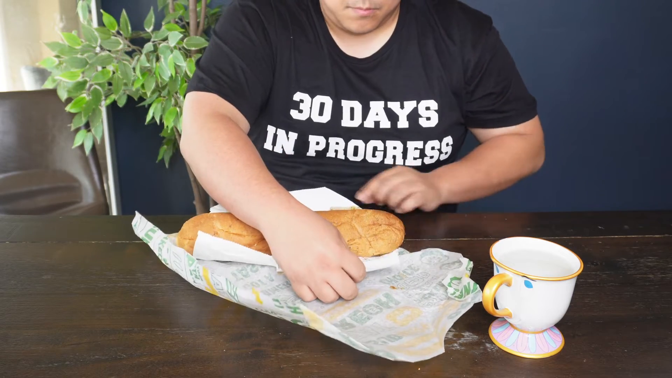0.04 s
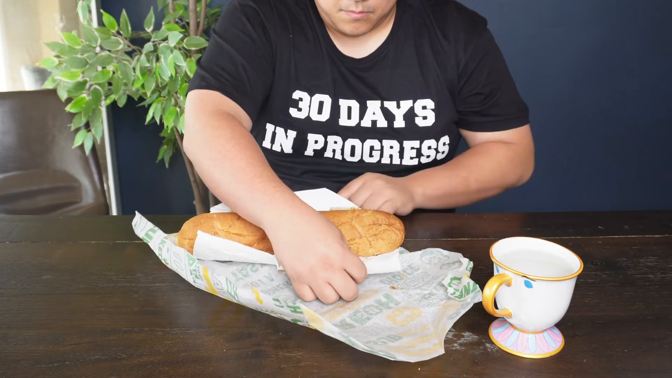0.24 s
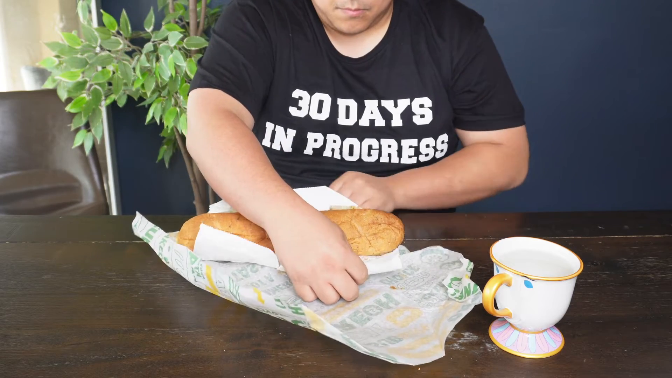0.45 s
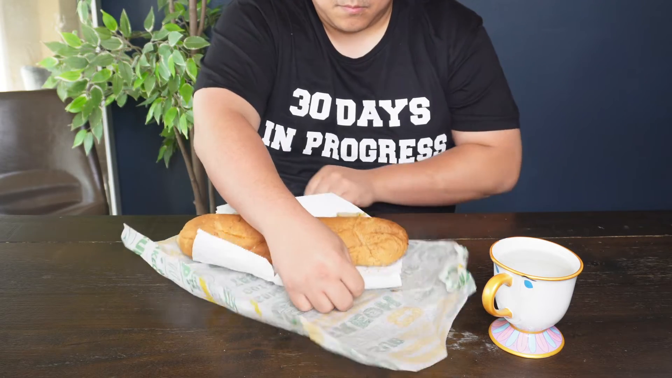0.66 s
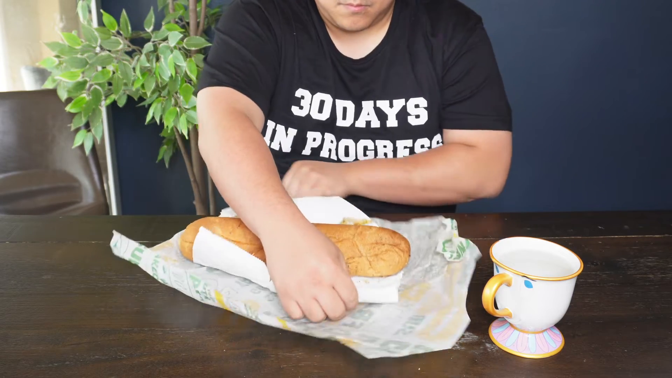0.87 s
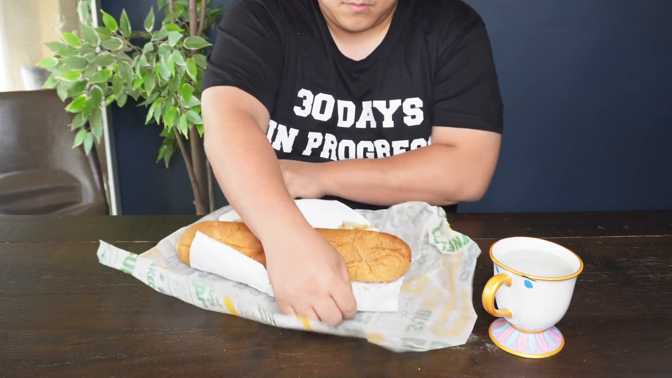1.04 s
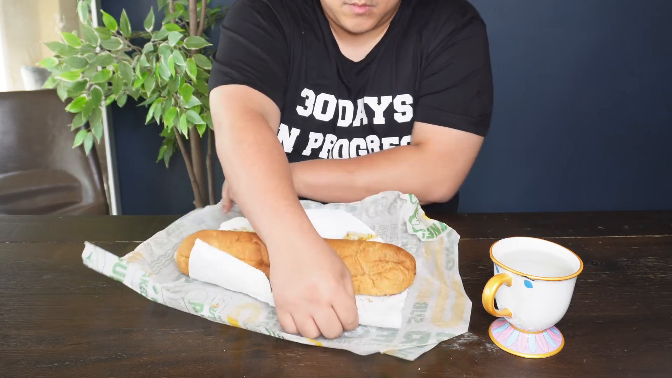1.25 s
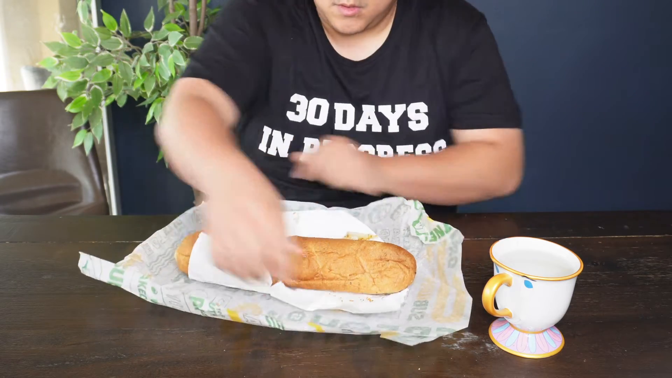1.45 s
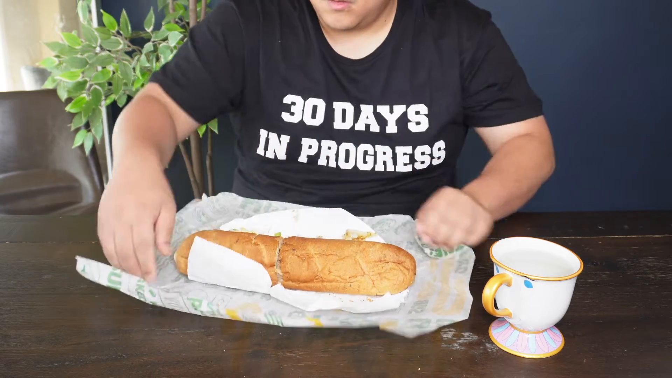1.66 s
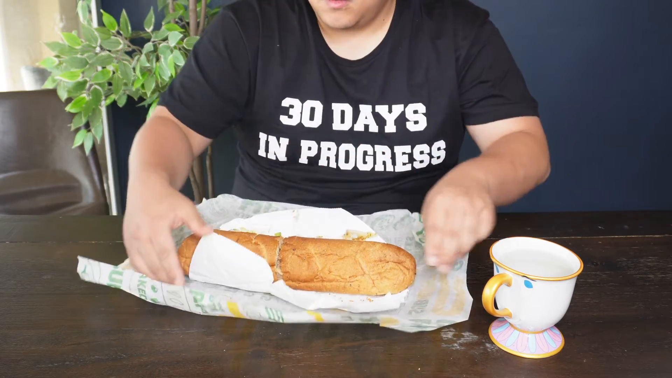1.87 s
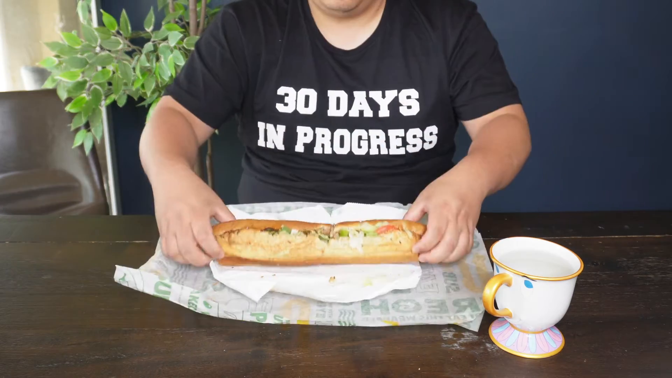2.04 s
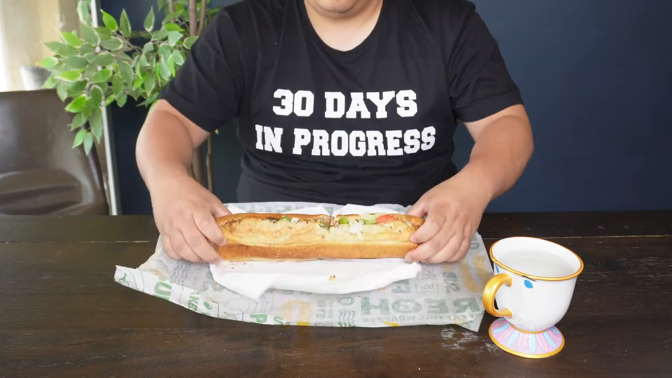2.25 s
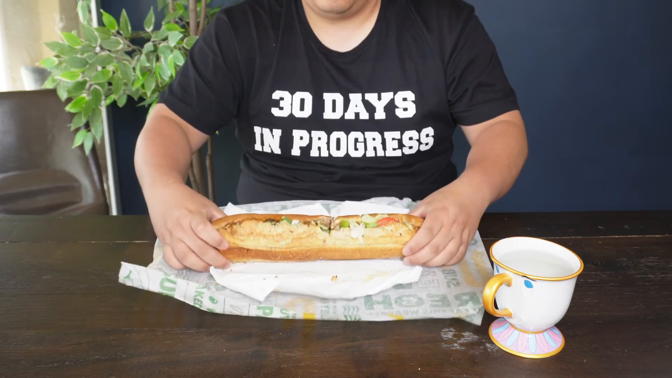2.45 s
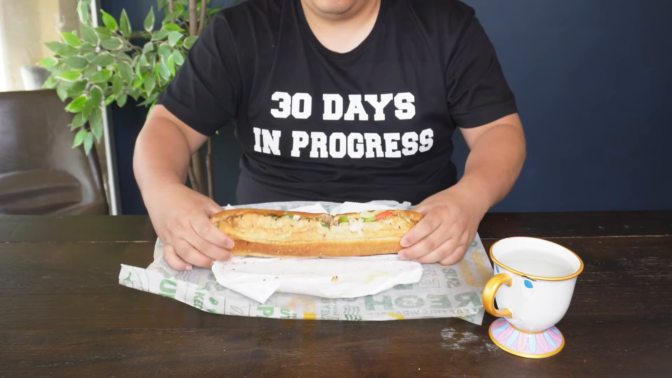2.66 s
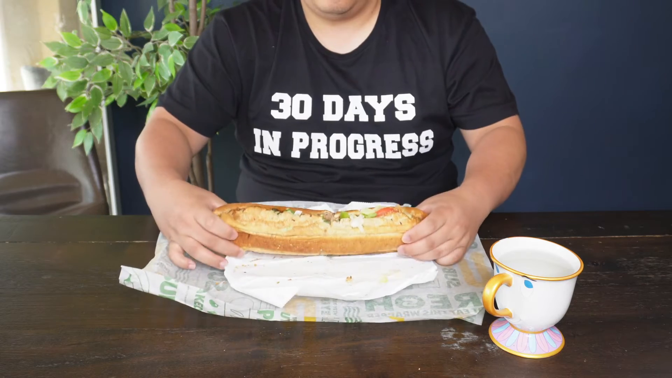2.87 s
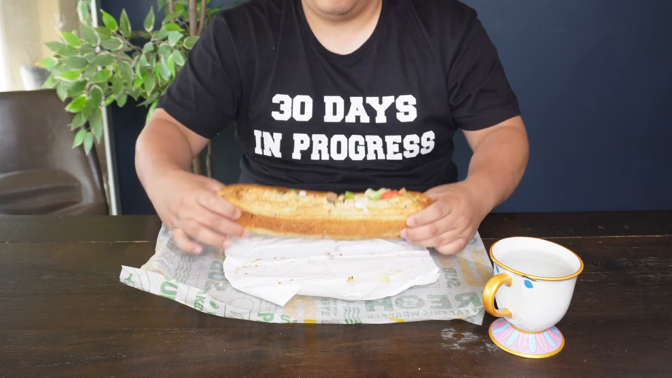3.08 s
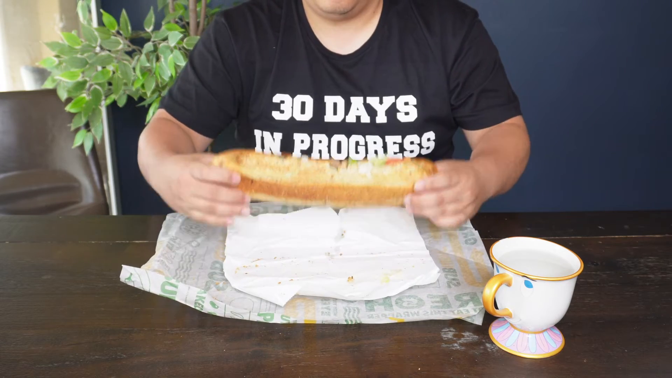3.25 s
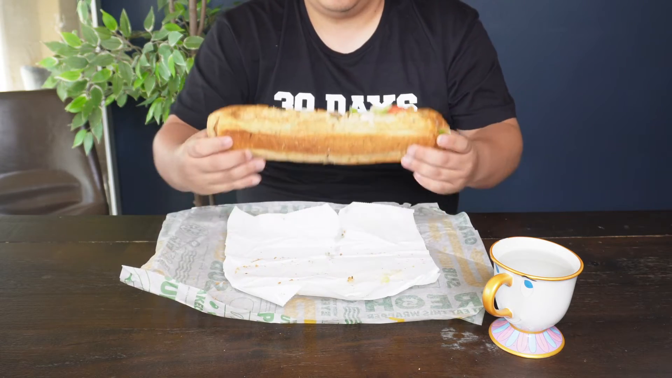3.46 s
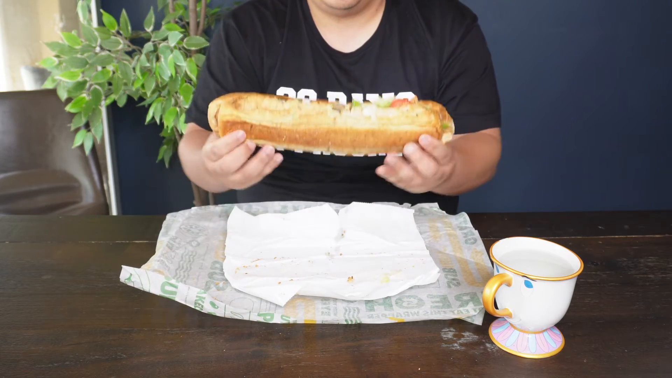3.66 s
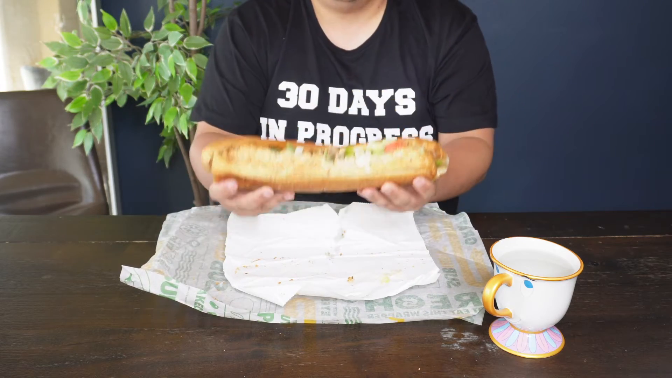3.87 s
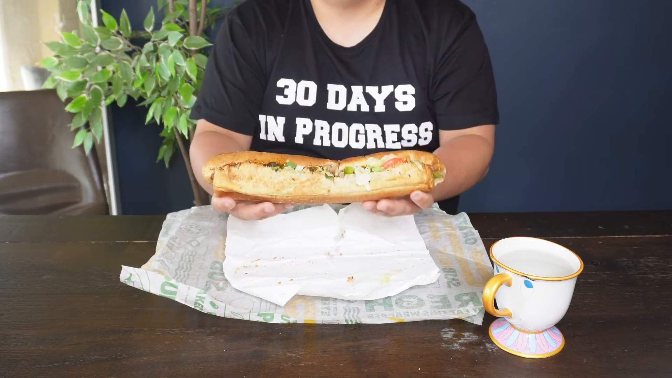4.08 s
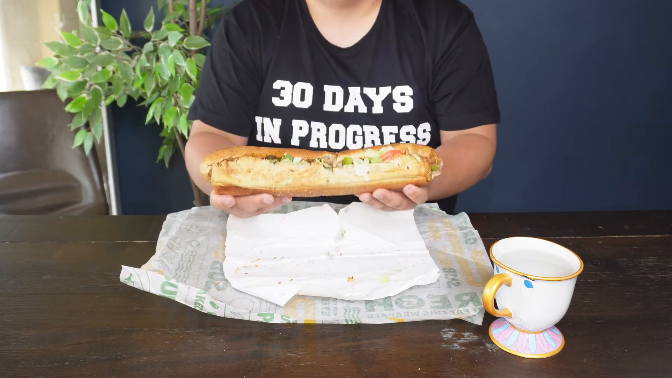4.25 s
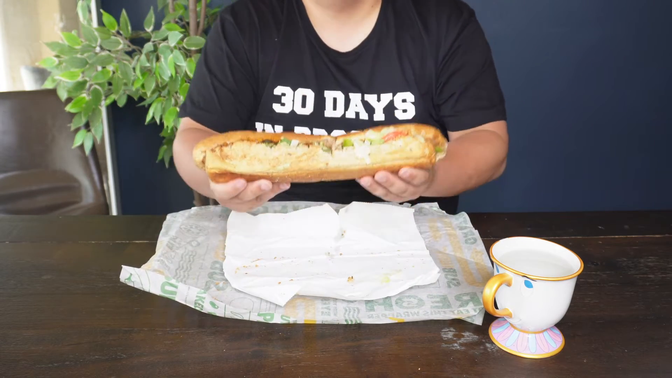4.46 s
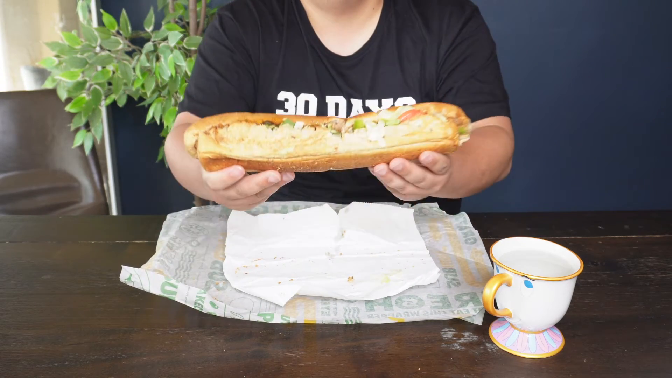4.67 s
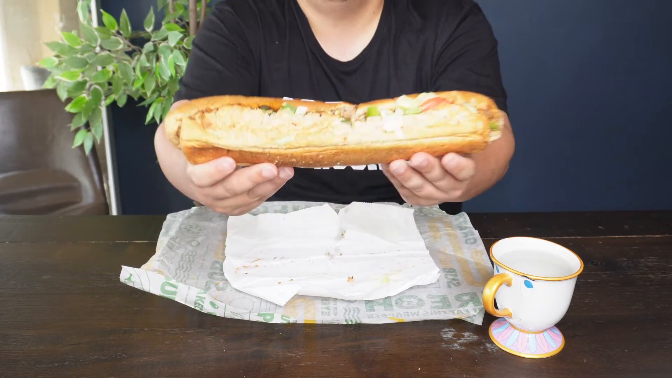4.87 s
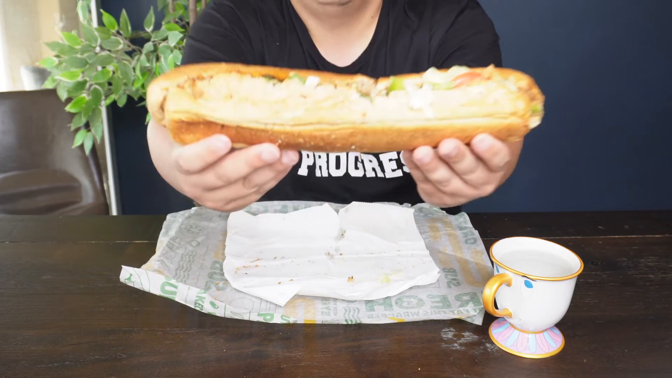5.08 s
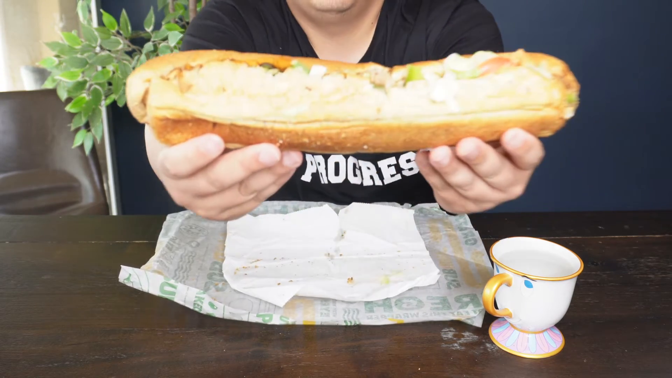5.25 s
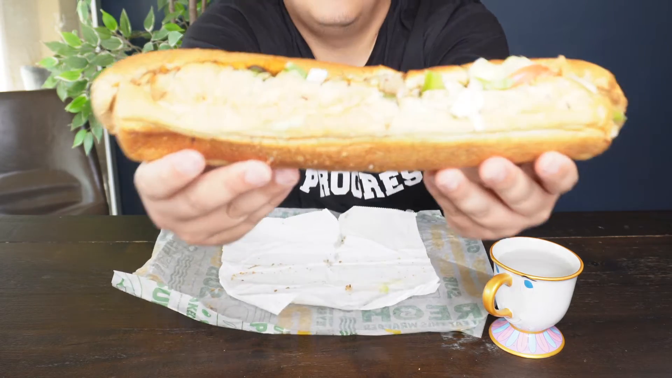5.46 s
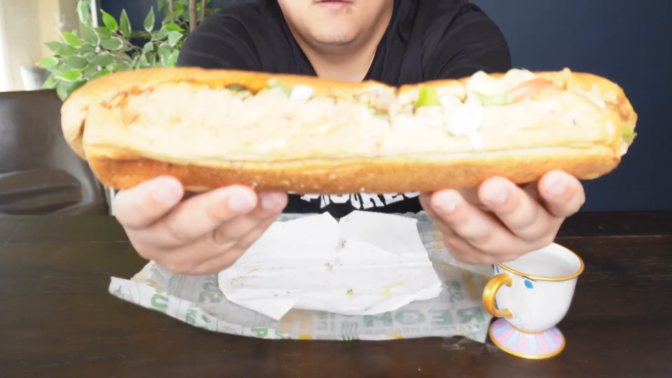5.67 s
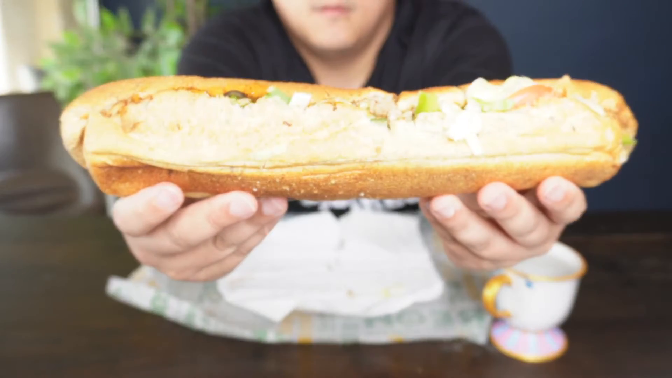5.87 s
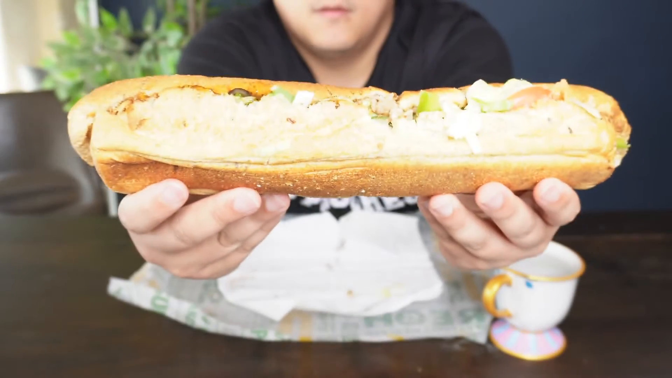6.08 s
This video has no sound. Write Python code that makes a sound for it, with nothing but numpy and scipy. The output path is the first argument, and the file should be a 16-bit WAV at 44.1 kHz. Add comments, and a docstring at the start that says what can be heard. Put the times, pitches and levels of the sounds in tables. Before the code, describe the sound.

Close, crisp rustling of a food wrapper being slid and unfolded indoors, with sharp crease pops, soft table thuds and a late crackle.

```python
"""A dry paper rustle runs throughout over quiet room air: hands slide and unfold a wrapper on a wooden
table, then lift the bread off it. Sliding and short grips are swarms of tiny ticks; loud snaps are noise
bursts. A drag and soft landings ring the table modes, and scrapes ring a stiff fold. Noise tails answer
as a short room. Just before 2 s the sliding and the room tail sink, then return abruptly."""
import sys
import numpy as np
from scipy import signal
from scipy.fft import rfft, irfft
from scipy.io import wavfile
from scipy.ndimage import uniform_filter1d

SR = 44100
rng = np.random.default_rng(int(sys.argv[2]) if len(sys.argv) > 2 else 0)


def master(y):
    """Save y as 16-bit WAV."""
    cut = np.clip(np.atleast_2d(y).T, -1, 1)
    pcm = np.round(cut * 32767)  # scale
    wavfile.write(sys.argv[1], SR, pcm.astype(np.int16))


N = 269892

# Steady sliding of the paper, one list a part, relative levels:
# (time [s], level at 4 kHz [dB], 1.2 kHz above that [dB], 11 kHz above that [dB])
SLIDE = [
    [(0.0, -47, -1.5, -18), (0.34, -50.5, -6, -18), (0.39, -35.5, -5.5, -12), (0.57, -29.5, -5.5, -5.5),
     (1.0, -34.5, -5, -1.5), (1.2, -29.5, -5.5, -1), (1.38, -36.5, -4, -3.5), (1.52, -46.5, -6, -17),
     (1.7, -42, -0.5, 0.5), (1.93, -49.5, -4, -5), (1.985, -57, 0, -17)],
    [(1.99, -42, -1, -8), (2.72, -41, 0.5, -19), (3.1, -52, -5, -10), (3.75, -51, 5, -11),
     (4.1, -42.5, -3.5, -9), (4.4, -51.5, -6, -12), (4.69, -57, -3, -8), (5.2, -55, 0, -5),
     (5.29, -47, -2.5, -1), (5.37, -38, -11, 3), (5.46, -44, -1.5, -8.5), (5.62, -44, -7, -7),
     (5.9, -49.5, -1, -13), (6.12, -60, -7, -18)],
]
# Grips that crush the paper, relative levels: (peak time [s], level at 4 kHz [dB], rise [s], t60 [s],
# 1.2 kHz above that [dB], 11 kHz above that [dB])
GRIPS = [(.012, -42.5, .01, 0.11, 1, -2.5), (.082, -43, 0.045, 0.16, 6, -4),
         (.222, -39.5, .02, .2, -4.5, -26), (.262, -42, 0.027, 1.5, -4, -18),
         (.372, -38.5, 0.01, 0.18, 4, -2), (.43, -34.5, 0.023, .4, -14, -1.5),
         (.63, -26, 0.14, 0.21, -8, -3.5), (.94, -32.5, 0.14, 0.38, -14, -3),
         (1.15, -32, .06, 0.37, -19, -9), (1.362, -30, 0.07, 0.25, -7, -3), (1.455, -42, .02, .3, -4, -3),
         (1.551, -36, 0.014, 0.5, -5.5, -2), (1.77, -44.5, 0.13, 0.16, 7, 1.5),
         (1.83, -39, 0.025, 0.55, -8.5, -3), (1.992, -32.5, 0.0053, 1.6, -4, -4.5),
         (2.092, -31, 0.02, 0.68, -1.5, -14), (2.24, -24.5, 0.016, 0.085, -10.5, -5),
         (2.276, -32.5, .005, 0.27, -3, -6), (2.38, -25.5, 0.028, .35, -13, -4.5),
         (2.491, -29, 0.057, 0.65, 0.5, 2.5), (2.691, -33, 0.014, 0.16, -2, -3),
         (2.85, -35.5, 0.21, 0.9, 0.5, 1), (3.092, -43, .012, 0.12, 6, -12.5),
         (3.255, -42.5, 0.099, 0.56, -2, -5), (3.38, -43.5, .02, 0.46, -3, 5.5),
         (3.77, -49, .01, 0.28, 0, -3), (3.83, -40.5, 0.022, 0.26, 2, -5), (3.925, -49, 0.022, 1.2, 2, 2.5),
         (4.222, -44.5, .01, 0.67, 4.5, -3), (4.36, -46, 0.033, 0.5, 7.5, -3),
         (5.715, -45.5, .015, 0.56, -3, -2)]
# Anchors of the rustle's colour: (low [Hz], middle [Hz], high [Hz])
COLOUR_HZ = (1200, 4000, 11000)
# Level of the room air, one list a part: (time [s], level [dB], added below about 100 Hz [dB])
AIR_LEVEL = [
    [(0.0, -56, -5), (1.2, -57, -14), (1.985, -53, -6)],
    [(1.99, -48.5, -6), (4.2, -46.5, -0.5), (5.5, -47, -8), (6.12, -46.5, -7)],
]
# Spectral shape of the air: (frequency [Hz], relative density [dB per Hz])
AIR_SPECTRUM = [(15, -44), (25, -46), (70, -0.5), (358, -1), (687, -7.5), (831, -4), (902, -7),
                (1010, -6.5), (1600, -6), (15200, -25), (16500, -44)]
# Stereo likeness of the air: (frequency [Hz], left-right likeness [-1 to 1])
AIR_LIKENESS = [(60, 1), (240, 0.81), (950, 0.62), (3770, 0.18), (15000, 0.092)]
# Decay of the room tail: (frequency [Hz], t60 [s])
ROOM_DECAY = [(300, 0.38), (1500, 0.15), (4000, 0.32), (12000, 0.21)]
# Stereo likeness of the room tail: (frequency [Hz], left-right likeness [-1 to 1])
ROOM_LIKENESS = [(300, 0.64), (1500, 1), (4000, .8), (12000, 0.043)]
# Snapping creases: (time [s], ring peak before panning [dB], pitch [Hz], treble crack above that peak [dB])
SNAPS = [(0.0858, -23.5, 3340, -8), (0.1214, -24, 4540, -6.5), (0.2657, -21.5, 4300, -26),
         (0.373, -25.5, 3350, -4), (0.392, -22, 3590, -18), (0.4084, -19, 3380, -25),
         (.4336, -18, 3120, -21), (.4615, -20, 3470, -17), (0.504, -20, 3860, -6), (0.5195, -19, 2760, -23),
         (0.538, -17, 4170, -24), (0.563, -13, 4220, -24), (0.5654, -15, 3520, -25),
         (0.6017, -11, 3960, -30), (.631, -20, 4790, -13), (0.6371, -23, 3830, -4),
         (0.7149, -13, 5630, -20), (.7718, -23, 3700, 1), (0.7759, -19, 5490, -1), (0.9413, -16, 4200, -20),
         (1.0636, -21, 4300, -23), (1.2327, -14, 5030, -2), (1.3579, -17, 4100, -17), (1.44, -28, 4500, -5),
         (1.4565, -23.5, 5750, -7), (1.553, -24, 4400, 3.5), (1.5959, -13, 5200, -2.5),
         (1.653, -28, 3220, -15), (1.6731, -26.5, 4550, -15), (1.69, -32, 2020, -12),
         (1.7267, -19.5, 5300, -15), (1.755, -21.5, 1180, -6), (1.7664, -15.5, 4570, -27),
         (1.8295, -22, 4700, -3), (1.8327, -17.5, 4960, -1), (1.9938, -27, 2720, -2),
         (2.0438, -24, 4130, -10), (2.0501, -17, 3850, -13), (2.0895, -25.5, 2930, 4),
         (2.09, -13, 2080, -20), (2.0995, -15.5, 1930, -20), (2.126, -13.5, 4450, -16),
         (2.187, -24, 3010, -19), (2.2324, -16.5, 3930, -1), (2.2365, -13.5, 5940, -20),
         (2.2473, -21, 4390, -4), (2.2741, -25, 6600, -16), (2.2761, -3.5, 5540, -36),
         (2.2785, -17.5, 1530, -20), (2.28, -11, 4800, -15), (2.2828, -11, 5600, -22),
         (2.2846, -19, 1500, -12), (2.3236, -18.5, 1900, -10), (2.3702, -20, 3580, -19),
         (2.38, -15, 5140, -11), (2.404, -11, 5470, -26), (2.4728, -20, 4430, -10),
         (2.4803, -18, 2540, -14), (2.4973, -18, 4440, -8), (2.531, -13, 4630, -5), (2.576, -15, 6260, -26),
         (2.618, -18, 1950, -20), (2.687, -18.5, 5900, 6.5), (2.879, -17, 4600, -9),
         (2.8819, -19.5, 4200, -8), (3.092, -23, 5280, -22), (3.1938, -34, 4690, -12),
         (3.2135, -30.5, 4284, -37), (3.2152, -13.5, 4000, -30), (3.217, -27, 2630, -25),
         (3.2614, -14.5, 4330, -34), (3.376, -27, 5600, -4), (3.3858, -19.5, 6760, -16),
         (3.3871, -19, 4260, -18), (3.5315, -28.5, 4470, -6), (3.6413, -30.5, 1560, -15),
         (3.653, -25.5, 3070, -10), (3.77, -23.5, 4070, 0), (3.81, -27, 1700, -18),
         (3.8262, -13.5, 3220, -13), (3.826, -23.5, 1310, -16), (3.8915, -30, 1900, -10),
         (3.9222, -20.5, 3430, -1), (3.9247, -23, 5030, -1), (3.965, -30, 5000, -3), (4.039, -30, 4000, -5),
         (4.086, -24.5, 3960, -6), (4.142, -38, 7000, -4), (4.223, -21, 4940, -6.5),
         (4.2805, -34, 2410, -12), (4.299, -24.5, 4200, -18), (4.3582, -20.5, 7460, -14),
         (4.3694, -21.5, 2970, -15), (4.379, -31, 6000, -3), (4.5022, -26, 4060, -32),
         (5.076, -34, 3240, -12), (5.325, -25.5, 5670, -4), (5.6294, -12, 3250, -27),
         (5.6316, -22, 2900, -18), (5.634, -24, 2420, -23), (5.6973, -22, 3840, -22),
         (5.7063, -25, 2000, -29), (5.713, -21, 4230, -22), (5.7132, -22, 1900, -22),
         (5.7128, -14, 3300, -28), (5.7154, -11, 4250, -20), (5.7159, -14, 3000, -27),
         (5.7465, -21, 2700, -20), (5.779, -28, 2410, -26), (5.86, -34, 3000, -22),
         (5.9413, -34, 2180, -20), (5.954, -34, 2000, -20)]
# Modes of the table top: (frequency [Hz], width in the drag [Hz], relative level in the drag [dB])
TABLE_MODES = [(76, 21, -18), (122.6, 17, 5), (220.3, 58, -5), (340.6, 46, 7.5), (546, 750, 6.5)]
# Arms and bread land on the table: (time [s], relative level [dB], t60 [s])
THUMPS = [(.419, -47, 0.14), (1.778, -41, 0.14), (2.03, -54, .2), (2.501, -49, 0.39), (4.075, -39.5, 0.36),
          (4.241, -41, 0.19), (4.411, -43, 0.26), (4.649, -41, 0.12), (5.471, -44, 0.23)]
# A fingertip scrapes stiff paper: (start [s], end [s], level [dB])
SCRAPES = [(1.436, 1.72, -47), (3.807, 4.018, -46.5), (4.33, 4.603, -54.5)]
# Modes of the stiff fold: (frequency [Hz], width [Hz], relative level [dB])
SCRAPE_MODES = [(1190, 51, -13), (1740, 130, 6), (2370, 150, -3)]

RISE_DB = 19  # a grip climbs this far during its rise
SLIDING, CRUSHING = 0.28, 0.86  # crumpling, 0-1
SHEET_HZ, SHEET_OCTAVES, SHEET_DB = 980, 0.18, 3.5  # broad resonance of the spread sheet
HUM_HZ, HUM_DB = 121.3, -73  # centres that the hum wavers around
SNAP_T60_S, SNAP_PAN_DB = 0.006, 1.5  # decay of the ring; random left-right spread
CLICK_DB, CLICK_S = 10, 0.000304  # release click: height over the raw noise RMS, and delay
# bread dragged over the table top: swells from start to end
DRAG_S, DRAG_DB, DRAG_EDGE_S, DRAG_LUMPS_DB = (0.327, 1.4), (-55.5, -46), 0.021, 3
HISS_DB, EDGE_HZ = -66, 15800  # hiss before the band limit; upper band edge


def gain_of(db):
    """Decibels to amplitude gain."""
    return 10 ** (np.asarray(db) / 20)


def unit_rms(x):
    """Scale a signal to an RMS of one."""
    return x / np.sqrt(np.mean(x ** 2) + 1e-20)


def read(points, hz):
    """Read a frequency table along a logarithmic frequency axis."""
    f, value = np.transpose(points)
    return np.interp(np.log(hz + 1), np.log(f + 1), value)


def curves(parts):
    """Columns of the joined time tables at every sample."""
    s, *columns = np.concatenate(parts).T
    return [np.interp(np.arange(N) / SR, np.sort(s), column) for column in columns]


def add(mix, s, sound):
    """Mix a sound in at its time, cut off at the end of the scene."""
    part = mix[:, round(s * SR):][:, :sound.shape[1]]
    part += sound[:, :part.shape[1]]


def stereo_spectra(hz, likeness, z):
    """Left and right spectra that are alike by the share given."""
    same = np.clip(read(likeness, hz), -1, 1)[:, None]
    return np.array([z[0], same * z[0] + np.sqrt(1 - same ** 2) * z[1]])


def handling():
    """Level, colour and crumpling: steady sliding plus grips that climb fast and die away, summed as power."""
    t = np.arange(N) / SR
    slide_db, low_db, high_db = curves(SLIDE)
    slide = gain_of(slide_db + np.array([low_db, 0 * t, high_db])) ** 2
    crush = np.zeros((3, N))
    for s, db, rise_s, t60, low_db, high_db in GRIPS:
        climb_db = RISE_DB * (t - s) / max(rise_s, .002)
        fall_db = -60 * (t - s) / max(t60, .03)
        shape_db = np.where(t < s, climb_db, fall_db)
        crush += np.outer(gain_of([low_db, 0, high_db]), gain_of(db + shape_db)) ** 2
    low, mid, high = 10 * np.log10(slide + crush)
    crush_share = crush[1] / (slide[1] + crush[1])
    return mid, low - mid, high - mid, SLIDING + (CRUSHING - SLIDING) * crush_share


def tick(hz, t60, lag_s, spread, rise_s=0.00018):
    """A buckling crease: close panel modes, reaching left and right a little apart."""
    t = np.maximum(np.arange(1200) / SR - .0001 + np.array([[lag_s], [-lag_s]]) / 2, 0)
    ring = sum(np.sin(2 * np.pi * np.minimum(hz * k, SR * .4) * t) for k in spread)
    return ring * (1 - np.exp(-t / rise_s)) * gain_of(-60 * t / t60)


def rustle(per_s=16000, size_db=3.0, clump_db=4.0, t60_cycles=12.9, lag_s=.000012, tilt_db=-2.0, count=40):
    """Swarms of ticks of all pitches; crumpling makes them clump and makes a few of them large."""
    level_db, low_db, high_db, crumple = handling()
    crumple = np.clip(crumple, 0, 1)
    out = np.zeros((2, N))
    clumps = rng.standard_normal((3, N))
    clumps = unit_rms(uniform_filter1d(uniform_filter1d(clumps, 180), 180))
    for hz in np.geomspace(500, 15000, count):
        # blend the low, middle and high colours at this pitch
        place = np.interp(np.log(hz), np.log(COLOUR_HZ), [0, 1, 2])
        share = np.maximum(1 - abs(place - np.arange(3)), 0)
        colour_db = share[0] * low_db + share[2] * high_db + tilt_db * np.log2(hz / 4000) ** 2
        colour_db = colour_db + SHEET_DB * np.exp(-(np.log2(hz / SHEET_HZ) / SHEET_OCTAVES) ** 2)

        hits = rng.random(N) < per_s / count / SR * np.sqrt(hz / 4000)  # small panels give way more often
        spread_db = size_db * np.minimum(rng.exponential(1, N), 5)
        spread_db += clump_db * (share @ clumps + clumps[1]) / 2
        size = hits * rng.choice([-1, 1], N) * gain_of(crumple * (spread_db - 5.5))
        size = size / np.sqrt(hits.mean()) * gain_of(colour_db + level_db)

        lag = lag_s * rng.standard_normal()
        shape = tick(hz, t60_cycles / hz, lag, rng.uniform(0.9, 1.144, 2))
        out += signal.oaconvolve(size[None], shape / np.linalg.norm(shape[0]), axes=1)[:, :N]
    return out * gain_of(-10)


def air():
    """Shaped noise makes a low rush of room air with drifting patches; a sine adds a faint wavering hum."""
    frames, hz = N // 256 + 5, np.fft.rfftfreq(1024, 1 / SR)
    a, b, c, d, patches = rng.standard_normal((frames, 513, 5)).T
    patches = unit_rms(uniform_filter1d(uniform_filter1d(patches, 6, 0), 14, 1))
    z = stereo_spectra(hz, AIR_LIKENESS, [a + 1j * b, c + 1j * d])
    z = z * gain_of(read(AIR_SPECTRUM, hz)[:, None] + 1.14 * patches)
    rush = unit_rms(signal.istft(z, nperseg=1024, noverlap=768)[1][:, :N])

    level_db, bass_db = curves(AIR_LEVEL)
    bass = signal.sosfiltfilt(signal.butter(2, 100, fs=SR, output="sos"), rush)
    rush = (rush + (gain_of(bass_db) - 1) * bass) * gain_of(level_db)

    drift = unit_rms(uniform_filter1d(rng.standard_normal((2, N)), 3000))
    turns = np.cumsum(HUM_HZ + 4 * drift[0]) / SR
    return rush + gain_of(HUM_DB + 1.8 * drift[1]) * np.sin(2 * np.pi * turns)


def room(x, count=4, turn_s=.03):
    """Noise tails, each band dying at its own speed, blend in overlapping turns at a fixed pace to stay smooth."""
    z = [signal.stft(rng.standard_normal((count, SR // 2)), SR, nperseg=128) for side in "LR"]
    hz, t = z[0][:2]
    z = stereo_spectra(hz, ROOM_LIKENESS, [z[0][2], z[1][2]])
    z = z * gain_of(-60 * t / np.maximum(read(ROOM_DECAY, hz), .03)[:, None])
    tails = np.pad(signal.istft(z, SR, nperseg=128)[1], [(0, 0), (0, 0), (60, 0)])  # short delay first
    echoes = unit_rms(uniform_filter1d(rng.standard_normal(tails.shape[1:]), 90))
    tails = tails * gain_of(3.5 * echoes)  # single reflections stand out

    turn = np.pi * (np.arange(N) / SR / turn_s / count - np.arange(count)[:, None] / count)
    fed = x.mean(0) * np.cos(turn) * np.sqrt(2 / count)
    return signal.fftconvolve(fed[None], tails / np.linalg.norm(tails[0, 0]), axes=2)[..., :N].sum(1)


def snaps(lag_s=.000012, octaves=0.49, fall_db=-40, crack_hz=9500, rise_s=0.000054):
    """A crease lets go: a click and noise in a wide band around its pitch, with a longer treble crack."""
    out, t, f = np.zeros((2, N)), np.arange(512) / SR, np.fft.rfftfreq(512, 1 / SR) + 1
    shape = (1 - np.exp(-t / rise_s)) * gain_of(-60 * t / SNAP_T60_S)
    chance = rng.standard_normal((len(SNAPS), 514))
    for (s, db, hz, crack_db), (side, pan, *noise) in zip(SNAPS, chance):
        burst = rfft(noise) + gain_of(CLICK_DB) * np.exp(-2j * np.pi * f * CLICK_S)
        lag = np.exp(1j * np.pi * f * side * lag_s * np.array([[1], [-1]]))
        bands = [gain_of(np.maximum(-6 * (np.log2(f / centre) / octaves) ** 2, fall_db))
                 for centre in (hz, crack_hz)]
        ring, crack = (irfft(burst * band * lag) for band in bands)
        ring, crack = ring * shape, crack * shape ** 0.6  # the power stretches the crack's decay
        sound = ring / abs(ring).max() + gain_of(crack_db) * crack / abs(crack).max()
        add(out, s, sound * gain_of(db + SNAP_PAN_DB * np.array([[pan], [-pan]]) / 2))
    return out


def table():
    """Dragging shakes the modes of the table top with noise; soft blows ring them briefly."""
    t = np.arange(N) / SR
    contact = np.clip(np.minimum(t - DRAG_S[0], DRAG_S[1] - t) / DRAG_EDGE_S, 0, 1)
    lumps = unit_rms(uniform_filter1d(uniform_filter1d(rng.standard_normal(N), 2000), 2000))
    push = contact * gain_of(np.interp(t, DRAG_S, DRAG_DB) + DRAG_LUMPS_DB * lumps)
    noise = rng.standard_normal(N)
    drag = sum(signal.lfilter(*signal.iirpeak(hz, hz / width, SR), noise) * gain_of(db)
               for hz, width, db in TABLE_MODES)
    out = np.tile(unit_rms(drag) * push, (2, 1))

    t = t[:SR // 2]
    detunes = rng.standard_normal((len(THUMPS), len(TABLE_MODES)))
    for (s, db, t60), detune in zip(THUMPS, detunes):
        # a forearm drives the modes near 160 Hz best
        ring = sum(np.sin(2 * np.pi * hz * (1 + 0.067 * k) * t) * gain_of(-4 * np.log2(hz / 160) ** 2)
                   for (hz, _, _), k in zip(TABLE_MODES, detune))
        envelope = gain_of(db - 60 * t / max(t60, .03)) * (1 - np.exp(-t / 0.013))
        add(out, s, (envelope * ring)[None])
    return out


def scrape(per_s=2500, size_db=1.0, edge_s=0.03):
    """Dense uneven slips of a fingertip ring a few modes of the stiff fold."""
    t = np.arange(N) / SR
    slips = (rng.random(N) < per_s / SR) * rng.choice([-1, 1], N)
    slips = slips * gain_of(size_db * np.minimum(rng.exponential(1, N), 4))
    ring = sum(signal.lfilter(*signal.iirpeak(hz, hz / width, SR), slips) * gain_of(db)
               for hz, width, db in SCRAPE_MODES)
    contact = sum(gain_of(db) * np.clip(np.minimum(t - start, end - t) / edge_s, 0, 1)
                  for start, end, db in SCRAPES)
    return unit_rms(ring) * contact


def fade(restart, length_s=0.16, depth_db=-9):
    """Gain that sinks just ahead of the restart and is back at once."""
    ahead = (restart - np.arange(N)) / SR
    return gain_of(depth_db * np.where(ahead > 0, np.clip(1 - ahead / length_s, 0, 1), 0))


def scene():
    """Paper with its room tail, cleared of bass, over the table and the air."""
    swarm, cracks = rustle() + scrape(), snaps()
    restart = round(SLIDE[1][0][0] * SR)  # start of the second sliding part
    tails = room(gain_of(-7.5) * swarm + gain_of(-5.0) * cracks)
    paper = swarm + cracks + tails * fade(restart)
    thin = signal.butter(2, 450, "high", fs=SR, output="sos")  # thin paper moves no bass
    return signal.sosfilt(thin, paper) + table() + air()


def record(dry):
    """The microphone softens the top octave and adds its own hiss; then the band limit."""
    soft = signal.lfilter(*signal.butter(2, 14500, fs=SR), dry)
    soft = soft + gain_of(HISS_DB) * rng.standard_normal(dry.shape)
    band_limit = signal.firwin(511, EDGE_HZ, window=("kaiser", 9), fs=SR)
    return signal.oaconvolve(soft, band_limit[None], "same")


dry = scene()
out = record(dry)
master(out)
```